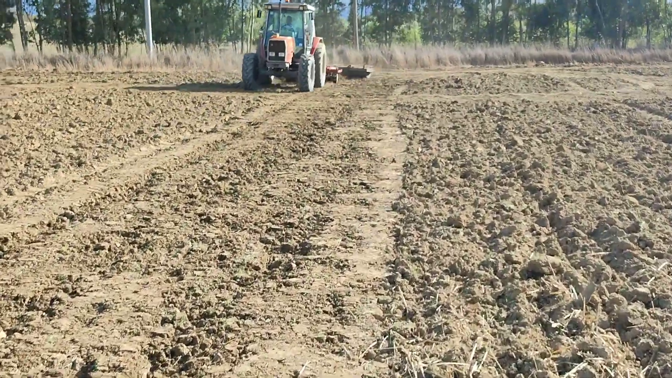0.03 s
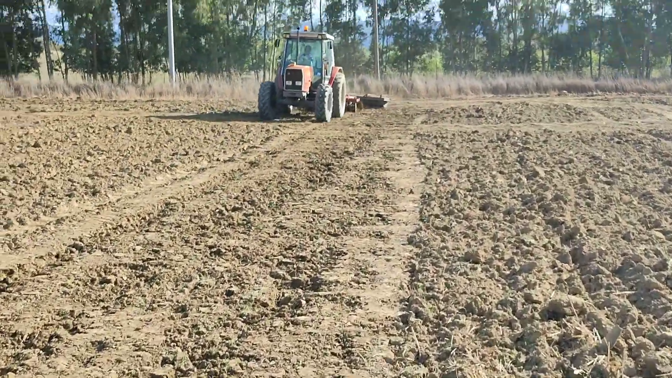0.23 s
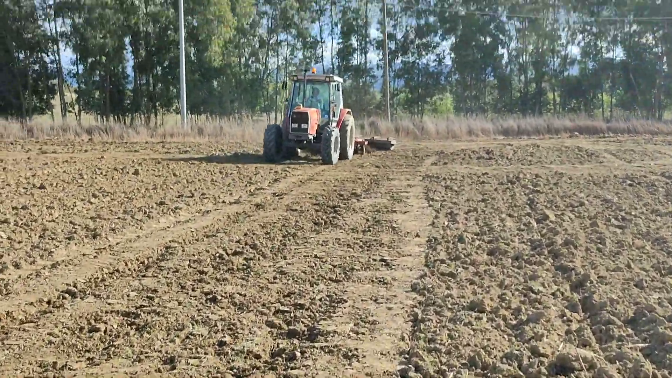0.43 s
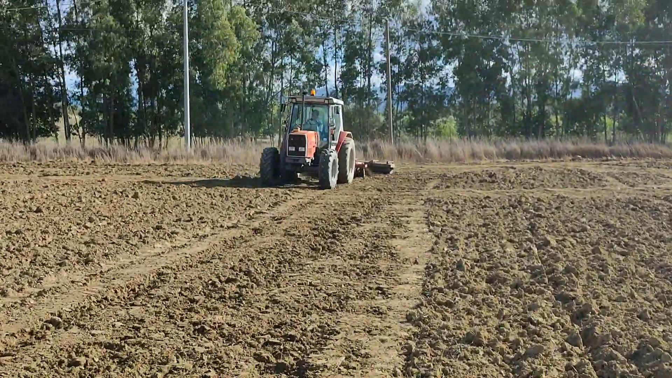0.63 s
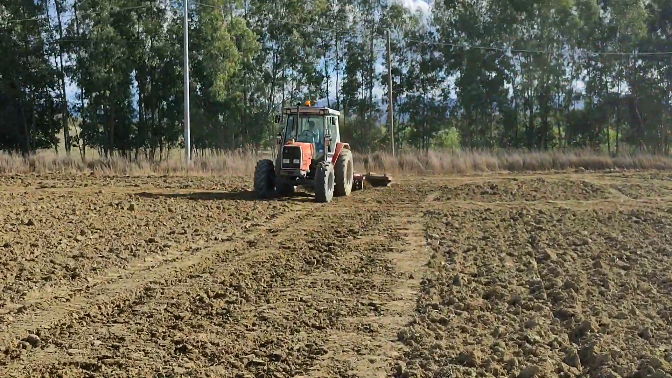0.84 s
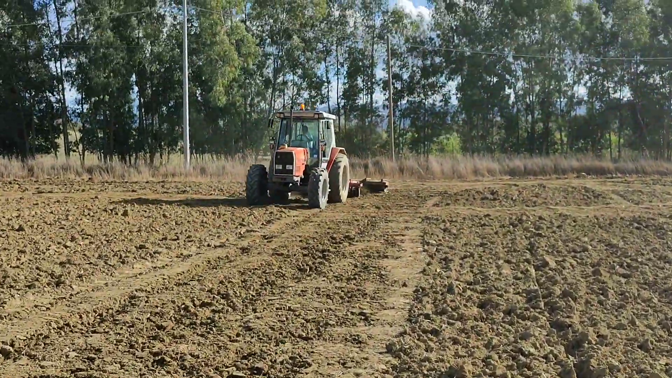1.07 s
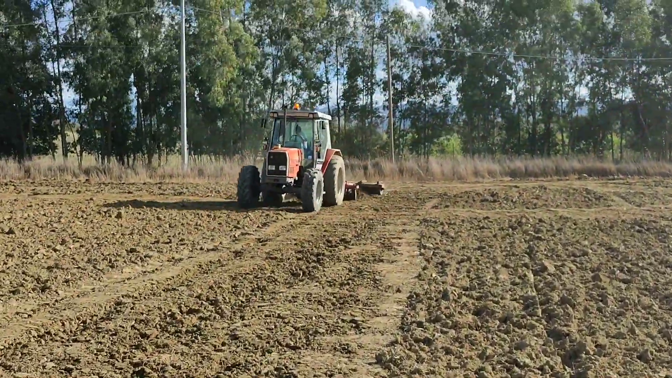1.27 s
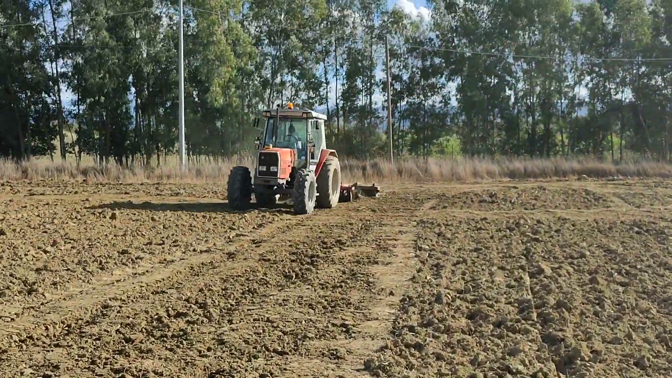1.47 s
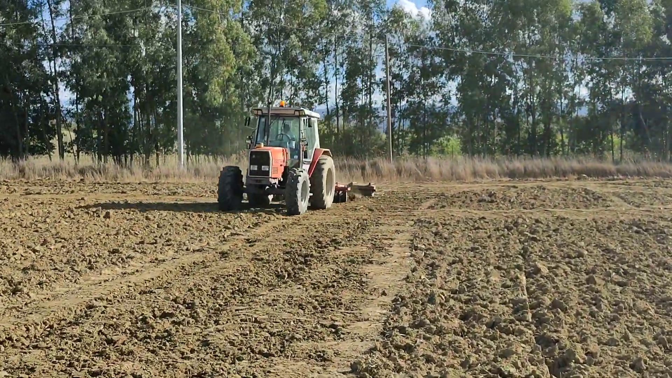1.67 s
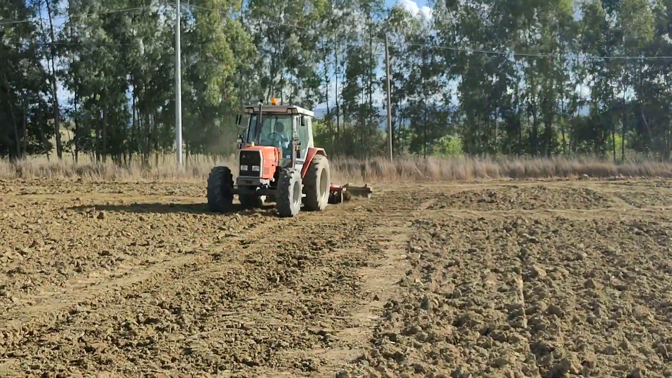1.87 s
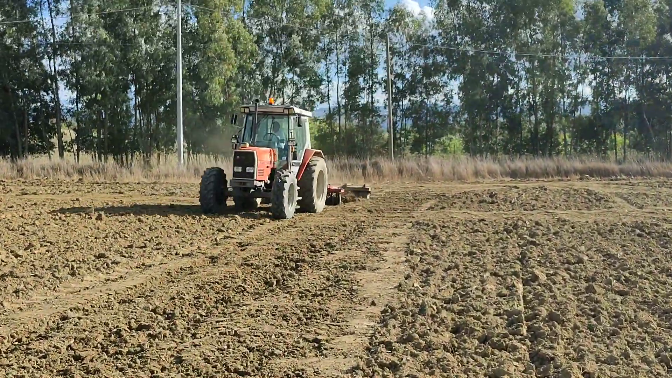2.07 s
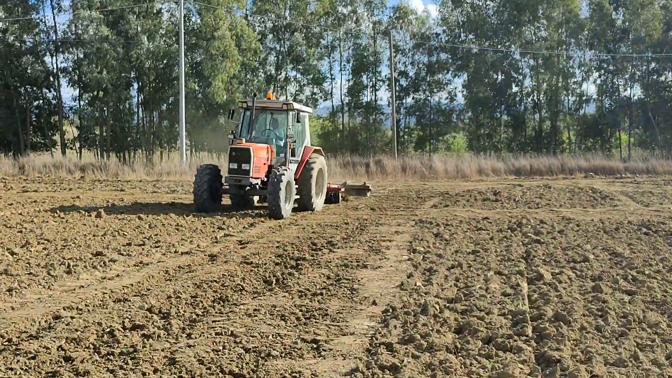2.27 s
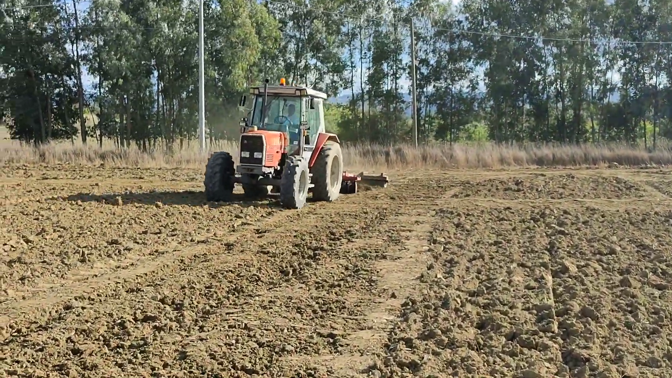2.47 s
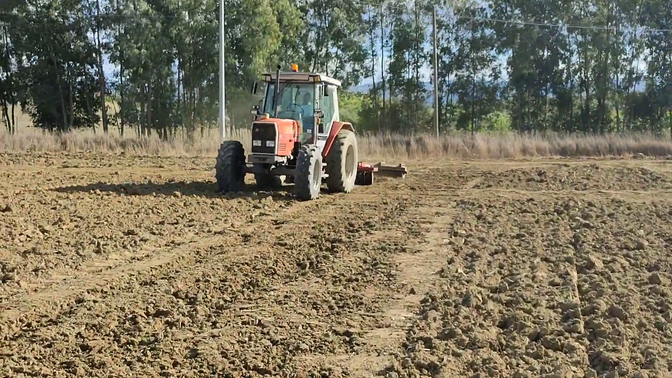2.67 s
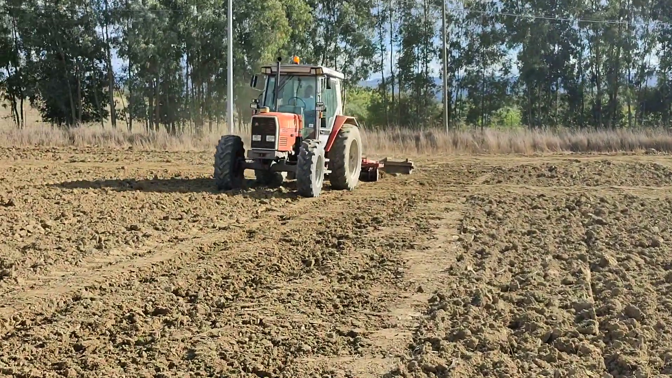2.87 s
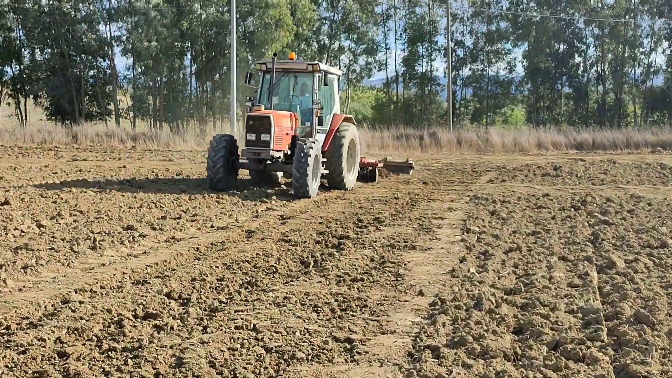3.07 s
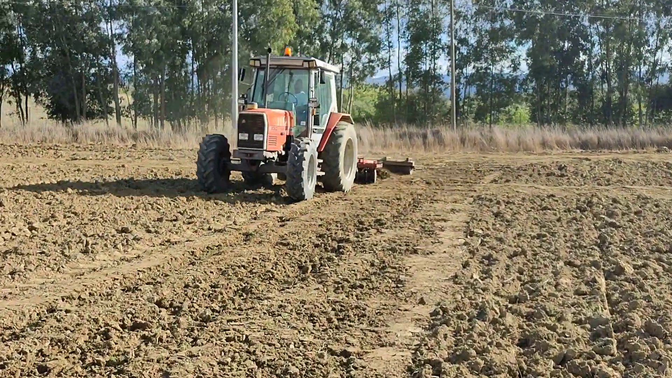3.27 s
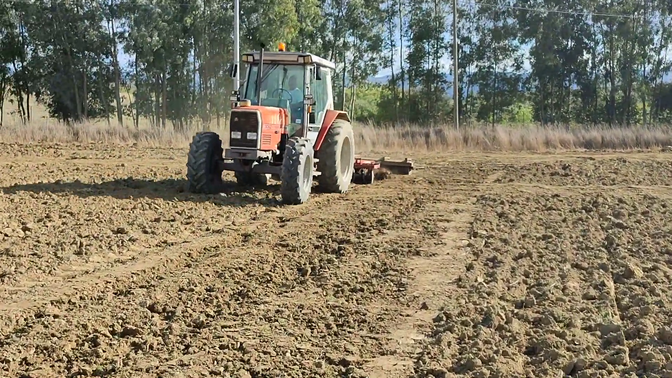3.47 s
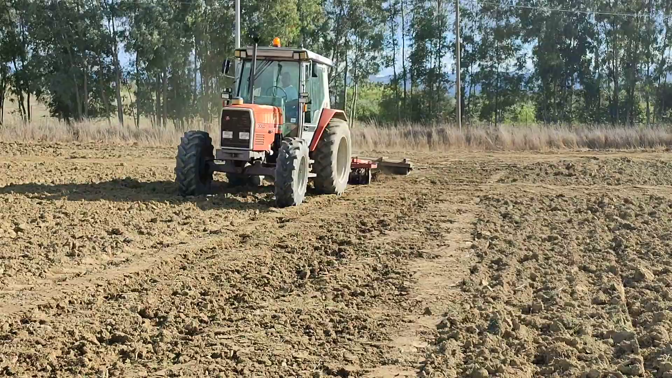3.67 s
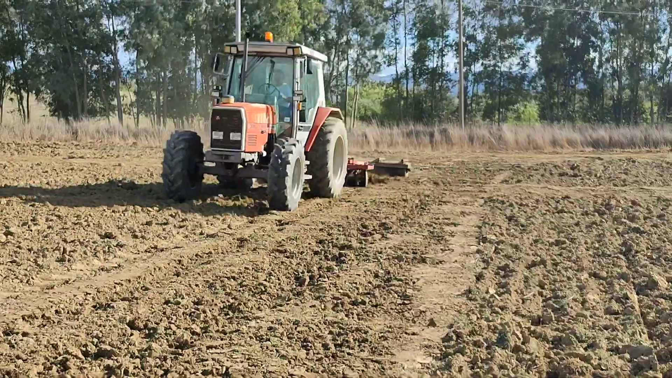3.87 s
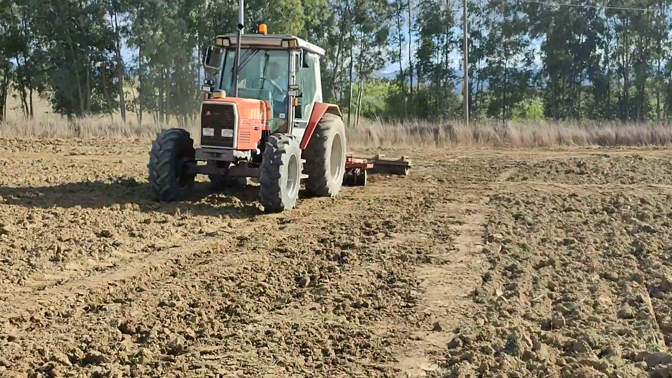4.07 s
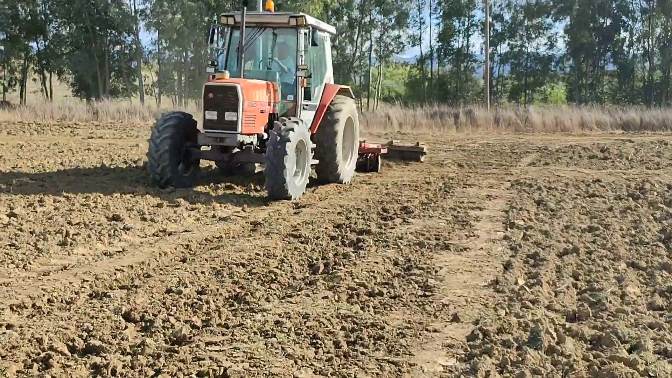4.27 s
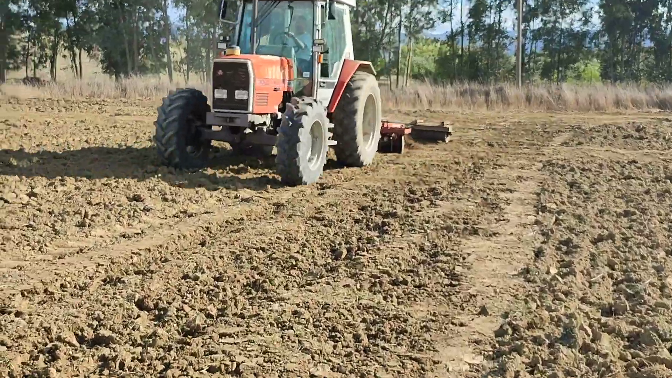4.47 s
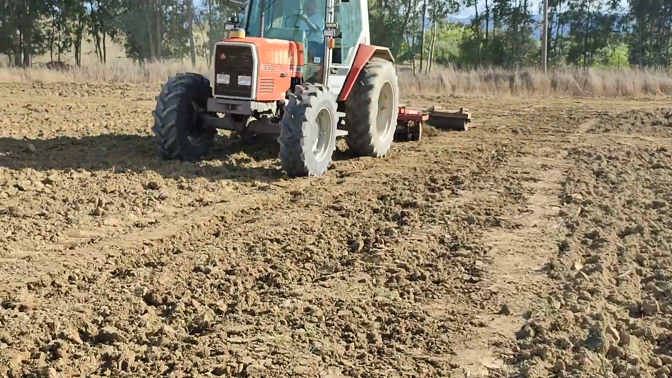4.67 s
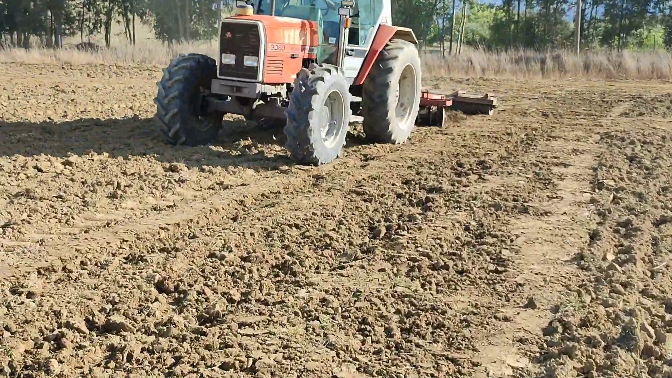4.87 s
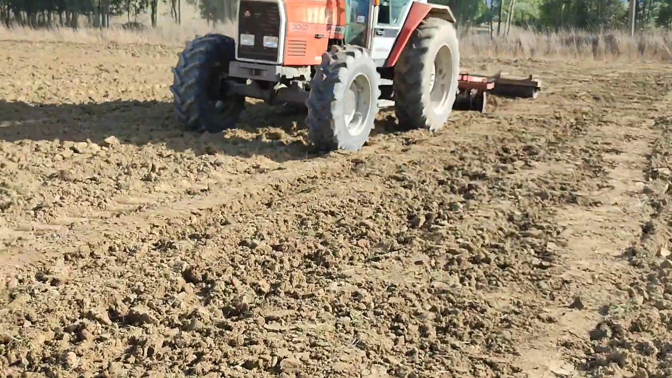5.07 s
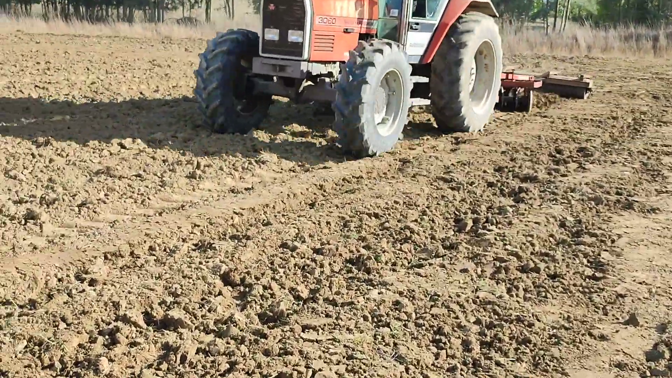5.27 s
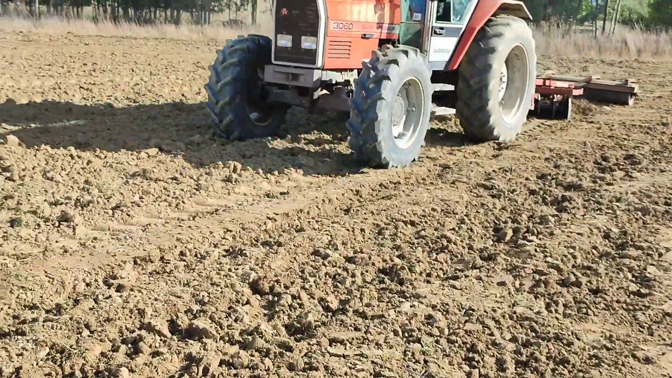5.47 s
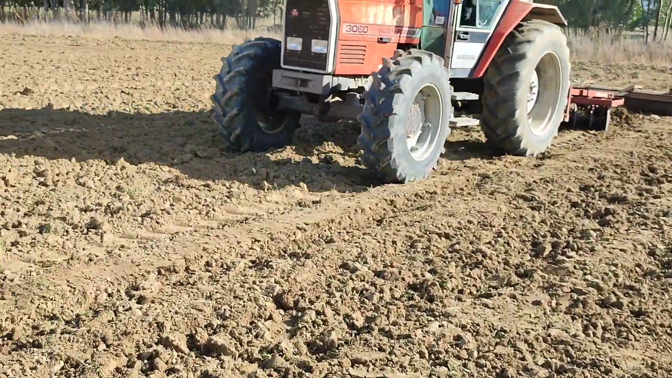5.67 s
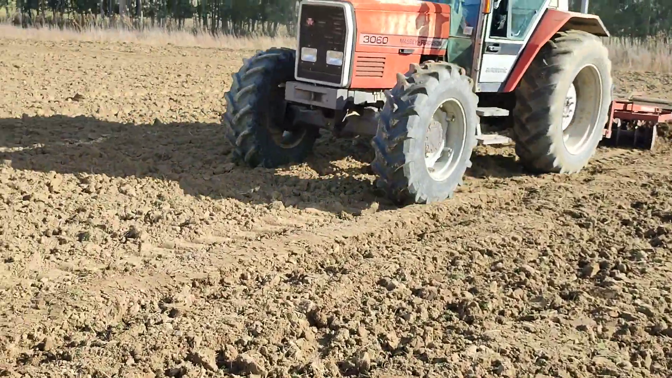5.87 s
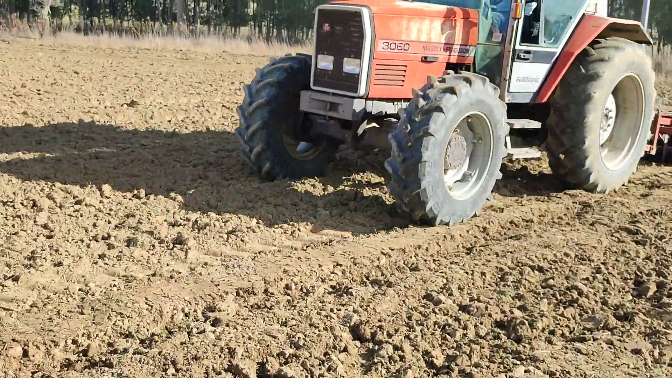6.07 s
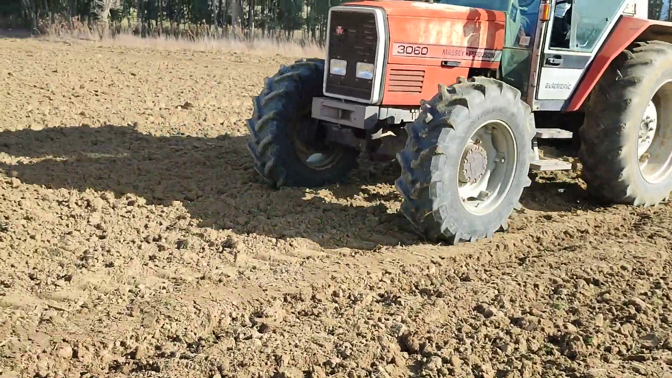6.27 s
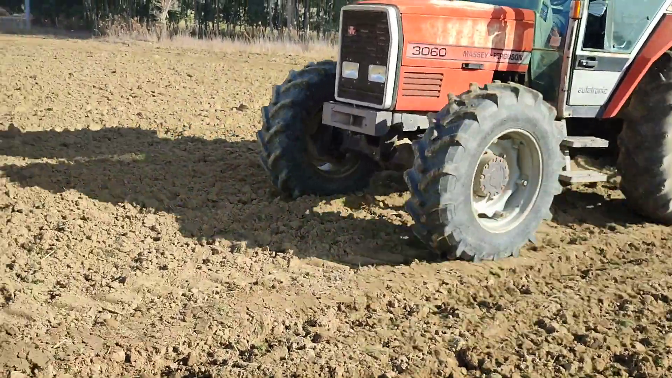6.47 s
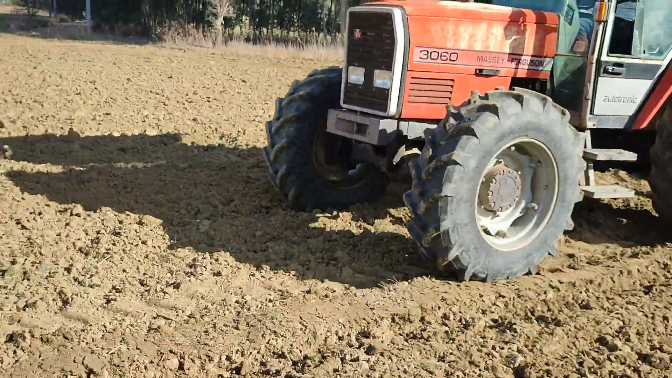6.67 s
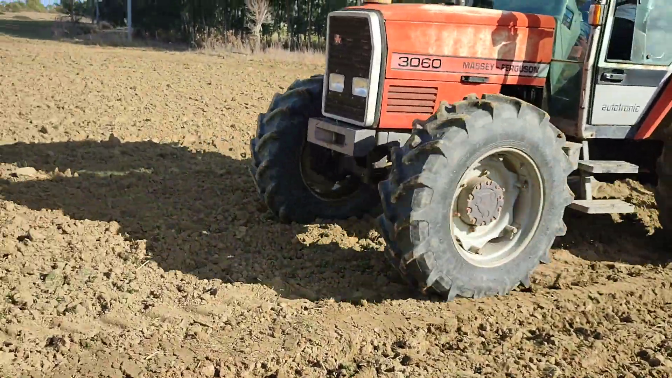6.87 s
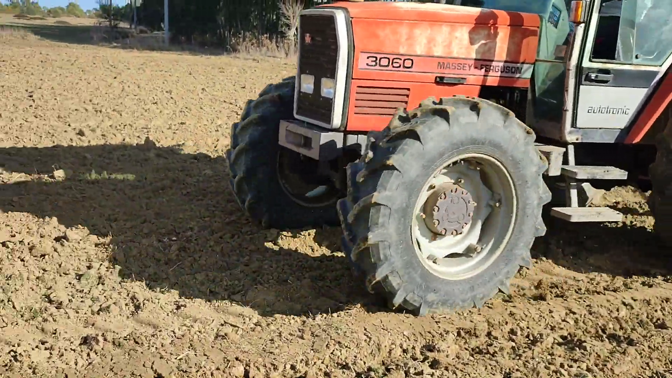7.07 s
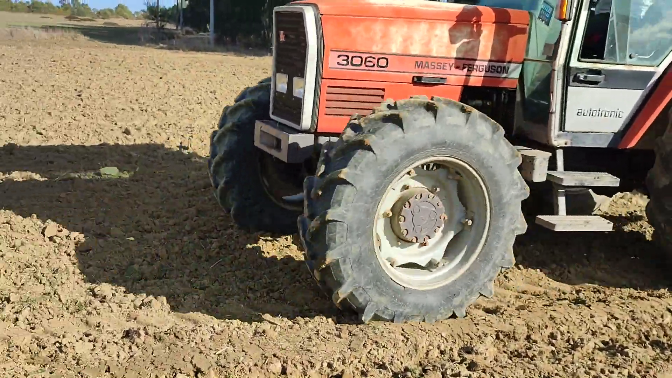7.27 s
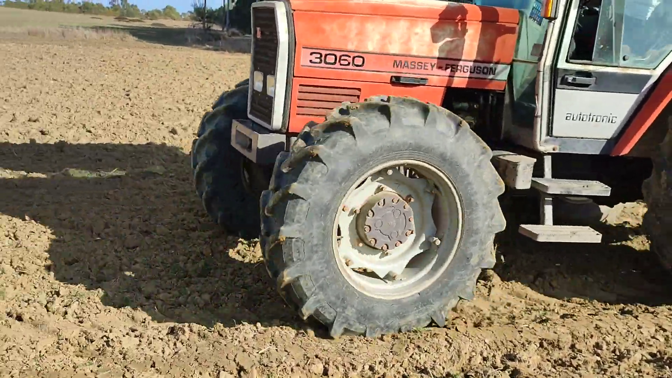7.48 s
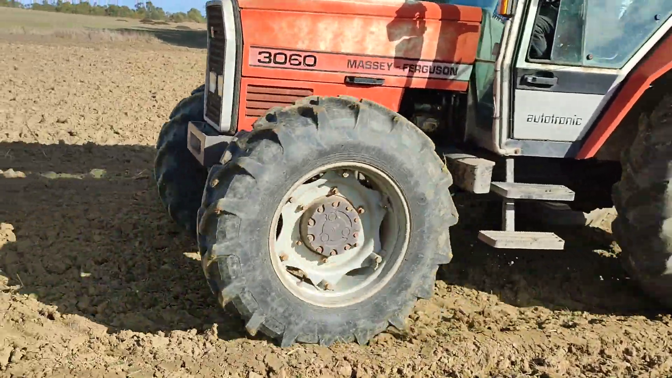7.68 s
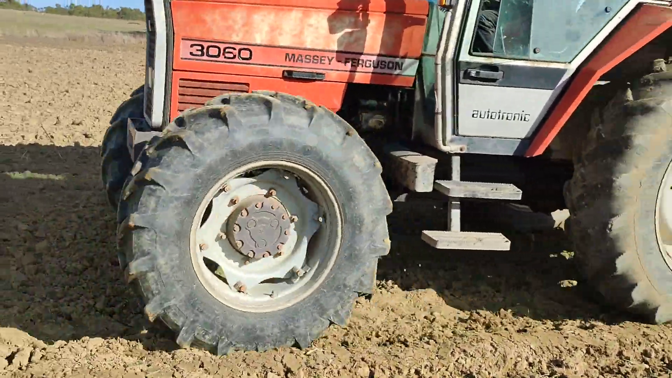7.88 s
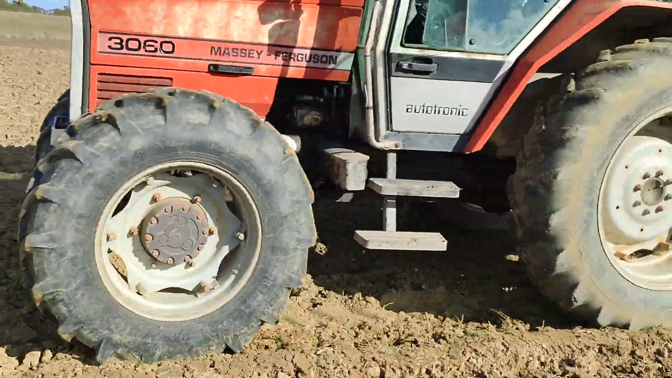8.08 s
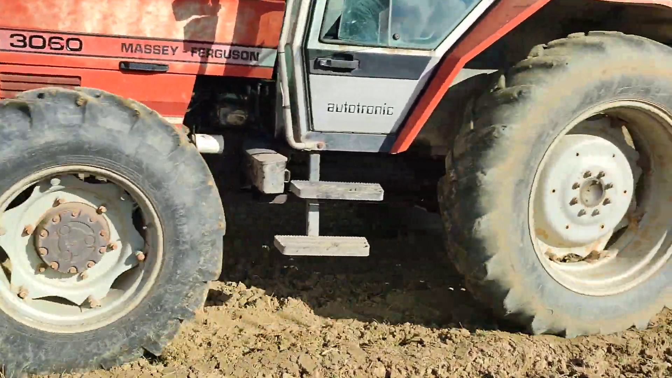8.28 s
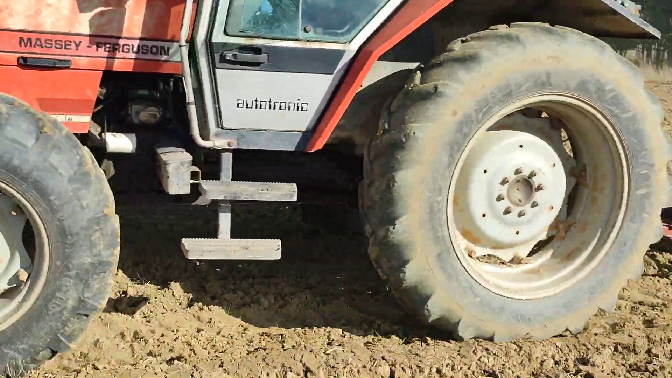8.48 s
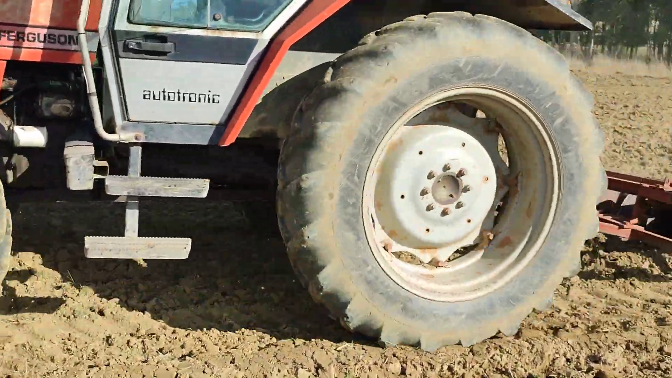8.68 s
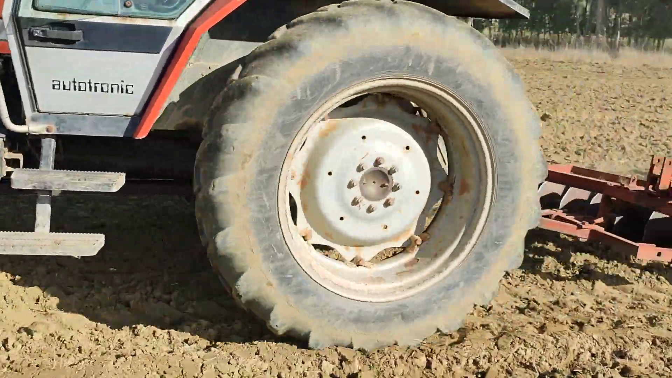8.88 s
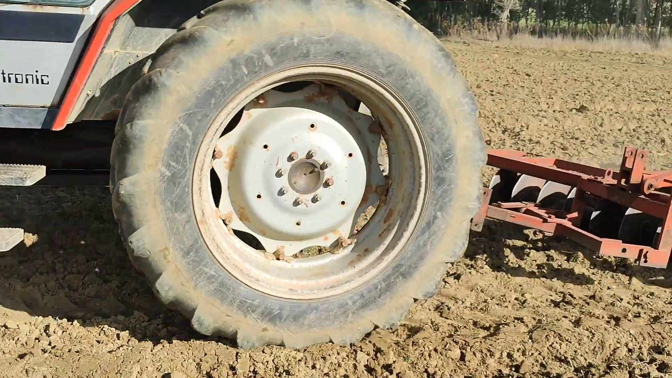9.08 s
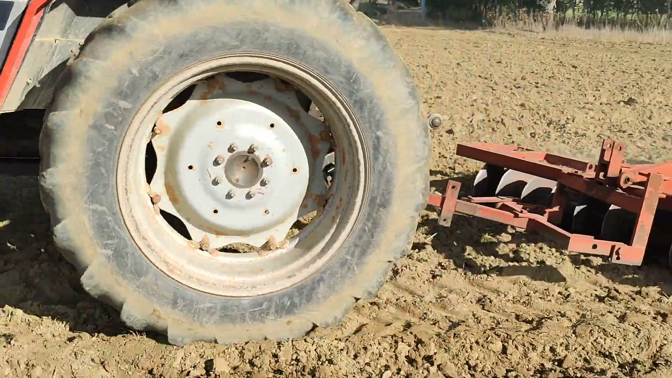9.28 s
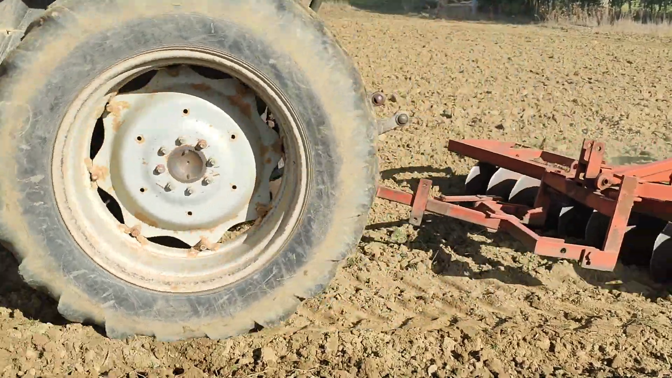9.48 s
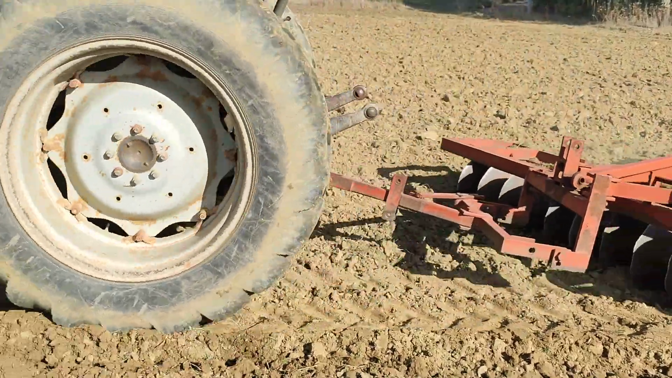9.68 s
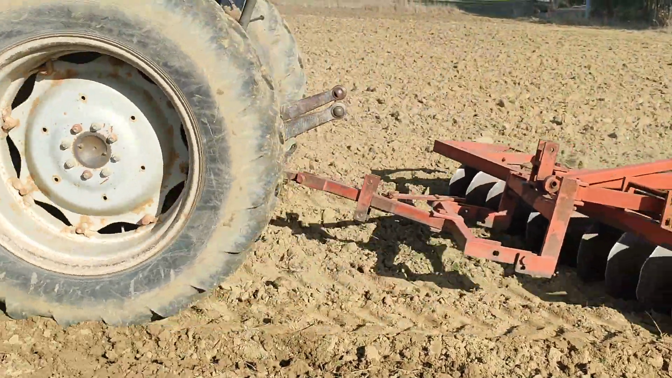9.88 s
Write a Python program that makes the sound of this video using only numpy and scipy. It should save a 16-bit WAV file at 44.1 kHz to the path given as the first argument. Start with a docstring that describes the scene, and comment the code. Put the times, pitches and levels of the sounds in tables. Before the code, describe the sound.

A diesel tractor works across an open field, at first some way off, with a steady low exhaust drone and fast engine knocking. Its towed disc harrow gives thin squeaks, and a dry bearing chirps on and off until about 7.5 seconds. A few tiny stone ticks come between 2 and 3.5 seconds. Wind rumbles on the microphone, mostly on the left, with hard thumps around 1 second, from 4 to 5 seconds and near 6.8 seconds. A dry crackle of soil runs underneath, loudest just before 6 seconds. The engine grows steadily louder, gaining hiss and gear whine, while steel parts ring in brief swells from about 5 seconds. Around 8 seconds the tractor passes close and briefly speeds up. At about 9 seconds it eases off and begins to move away, as the ringing discs draw near until the end at about 10 seconds.

```python
"""A four-cylinder diesel tractor drags a disc harrow (a row of steel discs) over a ploughed field.
At first it is some way off: the exhaust drones, each firing knocks the engine block, discs squeak and
a dry bearing chirps. As it nears, gusts thump the microphones, mostly the left. A dry crackle of soil
runs underneath, loudest just before 6 s. Steel parts ring in brief swells. Around 8 s the engine passes
close and briefly speeds up. Then it eases off and moves away, while the ringing discs draw near."""
import sys
import numpy as np
from scipy import signal
from scipy.fft import rfft, irfft, next_fast_len
from scipy.io import wavfile
from scipy.ndimage import uniform_filter1d, map_coordinates

SR = 44100
rng = np.random.default_rng(int(sys.argv[2]) if len(sys.argv) > 2 else 0)


def master_out(mix):
    """Clip the mix to full scale and print it as 16-bit PCM to the path in sys.argv[1]."""
    frames = np.transpose(np.atleast_2d(mix))
    ceiling = np.clip(frames, -1, 1)
    pcm = np.round(ceiling * 32767).astype(np.int16)
    wavfile.write(sys.argv[1], SR, pcm)


N = 437455
T = np.arange(N) / SR
FFT_SIZE = next_fast_len(N)
HZ = np.maximum(np.arange(FFT_SIZE // 2 + 1) * SR / FFT_SIZE, 1)

# Engine speed, with one push on the throttle: time_s, firings_per_s
ENGINE_SPEED = [(0, 59.1), (1.5, 58.5), (2.5, 58.1), (3.2, 58.5), (4.5, 58.5), (5, 58.0), (6, 58.05),
                (7.4, 58.35), (7.95, 58.3), (8.4, 61.3), (8.7, 64.9), (8.85, 64.8), (8.93, 61.4),
                (9.05, 59.6), (9.22, 59.8), (9.5, 58.3), (9.92, 58.5)]
# Tones of the exhaust pipe and silencer: multiple, level_db, falloff, behind_db, revved_db, slack_db
# Pitch is multiple x firing rate. A falloff of 1 halves the strength at twice the distance.
# The last three columns are added when heard from behind, when revved and when the throttle is let go.
PIPE_TONES = [(1, -13.5, 1.12, 0, 0.3, -2), (2, -32.3, 0.5, -3.5, 10, 0), (5, -36, 1.6, -0.5, -8, -9)]
SILENCER_TONES = [(3, -22.5, 2.3, 5.5, 0.5, -6), (4, -15, 2.45, 3.5, -2, -11.5)]
# Side facing us (0 far front, 1 front corner, 2 flank, 3 rear): time_s, side, right_delay_ms
VIEW = [(0, 0.89, 0.12), (1.5, 0.17, 0.12), (3.3, 0.1, 0.11), (5, 0.59, 0.12), (6, 1.03, 0.09),
        (6.9, 1.3, 0.071), (7.7, 1.64, 0.077), (8.1, 2.22, 0.26), (8.6, 2.03, 0.29), (9.1, 2.92, 0.4),
        (9.92, 3.18, 0.42)]
# Tone colour of the clatter from each side; a ground echo notches the front one: pitch_hz, gain_db
FRONT_COLOUR = [(140, -2), (210, -6), (350, -5.5), (445, -13), (540, 1.5), (690, 3.5), (860, 2),
                (1010, -13), (1140, 2.5), (1270, 3.5), (1440, -0.5), (1720, -15), (1980, -6), (2290, -20),
                (2520, -9.5), (3050, -16), (3350, -19.5), (4200, -21)]
CORNER_COLOUR = [(170, 8), (400, -4), (480, -13.5), (640, 6), (850, 3.5), (1100, -6.5), (1450, 2.5),
                 (1900, -12.5), (2150, -3.5), (2400, -12.5), (2900, -14.5), (3500, -16.5), (4200, -24.5)]
FLANK_COLOUR = [(140, 0.5), (340, -4), (470, -17.5), (620, -5), (800, -4), (1100, -8), (1280, -7.5),
                (1550, -9.5), (1850, -11), (2200, -8), (2800, -21), (3400, -27.5), (4200, -33)]
REAR_COLOUR = [(140, -3.5), (260, -4), (370, -3.5), (540, -13), (760, -5), (1000, -6.5), (1200, -4.5),
               (1430, -13), (1750, -11.5), (2100, -15), (2500, -17.5), (3000, -24), (3600, -23),
               (4200, -31.5)]
# Tone colour of the fan and fuel injector hiss: pitch_hz, gain_db
HISS_COLOUR = [(3600, -1), (4150, -4), (4700, -3.5), (5600, 3), (6300, 2), (6900, 3), (7500, -1.5),
               (8100, 2.5), (8700, 1.5), (10000, 1), (13500, -11)]
# Steady fan rush next to a full injector tick, for sides 0 to 3: gain
FAN_RUSH_BY_SIDE = [.5, .36, .7, .95]
# Hiss escaping toward sides 0 to 3: gain_db
HISS_BY_SIDE = [1.5, 3, 0, -1]
# How alike the engine noise is in both ears: pitch_hz, likeness (0 to 1)
EAR_LIKENESS = [(100, .95), (700, .92), (1300, .92), (2300, .74), (5000, .4), (12000, .2)]
# The treble briefly dips or flares: middle_s, length_s, gain_db
TREBLE_DIPS = [(4.818, 0.21, -13), (5.845, 0.16, -8), (5.94, 0.15, 5.5)]
# Fan and gear whines: middle_s, length_s, multiple (of the firing rate), level_db
GEAR_WHINES = [(7.7, 3.4, 5, -39), (7.6, 1.4, 3.75, -35), (8.7, .95, 8.25, -30.5), (7.22, 1, 12.27, -28),
               (7.98, .45, 12.27, -30), (6.55, .5, 13.17, -31), (7.8, 1.6, 14.75, -36),
               (7.2, 1, 25.05, -38)]
# Ringing notes of a thin steel part: pitch_hz, width_hz, gain_db
THIN_STEEL_NOTES = [(3615, 35, 0), (5020, 60, -10), (5280, 90, -12)]
# How loudly that part rings: time_s, level_db
THIN_STEEL_LEVEL = [(0, -58), (.9, -56), (1.3, -60), (2.6, -60), (3.2, -57), (4.2, -54), (5, -54),
                    (5.8, -58), (7.5, -53.5), (8.3, -62)]
# Notes the discs ring as they rub through the soil: pitch_hz, width_hz, level_db, left_minus_right_db
DISC_NOTES = [(2040, 240, -44.5, 6), (2577, 150, -50.5, 20), (3070, 170, -55, -11), (4070, 270, -51.5, 5)]
# Steel parts of the tractor and harrow ring briefly: middle_s, length_s, pitch_hz, width_hz, level_db
STEEL_SWELLS = [(4.9, .9, 2130, 110, -42), (6.55, .9, 3130, 300, -44), (6.9, 1.1, 1670, 130, -36),
                (7.72, .95, 2140, 130, -34.5), (8.25, .6, 2600, 160, -37.5), (8.66, .55, 2450, 400, -33),
                (9.2, .45, 2770, 90, -42), (9.8, 1.3, 1724, 170, -31.5)]
# Disc squeaks: middle_s, length_s, start_hz, end_hz, roughness (0 to 1), level_db
DISC_SQUEAKS = [(0.52, .34, 2680, 3180, 1, -48.5), (1.08, .6, 2560, 2500, .7, -51),
                (1.6, .4, 2950, 3100, .6, -48.5), (2.7, 1.6, 2530, 2590, .3, -56),
                (3.17, .32, 2900, 2580, .8, -47), (3.42, .3, 2560, 2600, .7, -48),
                (6.12, .16, 2750, 2880, 1, -44), (6.31, .18, 2860, 3000, 1, -40),
                (6.76, .22, 2980, 2780, 1, -42.5)]
# Chirps of a dry bearing: middle_s, level_db, pitch_hz
BEARING_CHIRPS = [(0.984, -42, 4200), (1.053, -40, 4100), (1.259, -42, 4080), (1.324, -42, 4120),
                  (1.67, -41, 4150), (1.78, -43, 4150), (1.941, -40, 4180), (1.994, -42, 4200),
                  (2.026, -42, 4200), (2.093, -43, 4150), (2.58, -41, 4050), (2.69, -41, 4250),
                  (3.53, -40, 4200), (3.58, -42, 4050), (4.01, -38, 4080), (4.509, -40, 4250),
                  (4.556, -38, 4200), (5.869, -38.5, 4060), (5.92, -39, 4150), (5.99, -36.5, 4170),
                  (6.059, -37.5, 4170), (7.021, -37, 4340), (7.298, -34, 4300), (7.454, -33, 4270)]
# Stones hitting the discs: start_s, level_db
STONE_HITS = [(2.24, -33), (2.605, -32), (3.095, -25), (3.545, -41)]
# The breeze between gusts: time_s, left_db, right_db
BREEZE_LEVEL = [(0, -29.5, -58), (1.0, -24, -31.5), (1.75, -28, -35), (2.05, -38, -60), (2.4, -34.5, -56),
                (2.65, -21, -30), (3.3, -22, -30), (3.85, -17.5, -28), (4.35, -15, -23),
                (5.5, -14.5, -22.5), (6.3, -15, -16), (7.2, -18.5, -22), (8.7, -20.5, -25),
                (9.5, -22, -20.5), (9.92, -26, -23.5)]
# Gusts on top of the breeze: start_s, length_s, left_db, right_db
WIND_GUSTS = [(0.339, 0.042, -20, -57), (0.45, 0.053, -21.5, -57), (0.649, 0.022, -14.5, -35),
              (0.707, 0.035, -13, -41), (0.778, 0.02, -11, -33), (0.832, 0.015, -12, -30),
              (0.889, 0.042, -13.5, -26), (0.963, 0.032, -14, -23), (1.025, 0.022, -15.5, -32),
              (1.11, 0.032, -20.5, -36), (1.493, 0.034, -25, -40), (1.677, 0.041, -23.5, -28),
              (2.658, 0.093, -21, -35), (2.824, 0.035, -21.5, -38), (3.046, 0.027, -17.5, -35),
              (3.436, 0.1, -14.5, -29), (3.664, 0.081, -17.5, -34), (3.935, 0.097, -13.5, -30),
              (4.233, 0.24, -14, -33), (4.49, 0.29, -16, -28), (4.879, 0.12, -13.5, -34),
              (5.187, 0.07, -33, -21), (5.73, 0.075, -23, -17.5), (5.95, 0.18, -18, -16.5),
              (6.215, 0.15, -13.5, -30), (6.804, 0.13, -19.5, -23), (8.093, 0.079, -21, -17),
              (9.207, 0.056, -14.5, -27), (9.507, 0.042, -16.5, -31)]
# Tone colour of air swirling at a microphone: pitch_hz, gain_db
WIND_COLOUR = [(15, -2.5), (35, 3.5), (65, 1), (120, 0.5), (190, -1), (330, -4.5), (500, -8.5), (750, -14),
               (1100, -21), (1800, -33.5), (4000, -71)]
# Hard thumps of wind on the left microphone: time_s, level_db
WIND_THUMPS = [(0.901, -9), (0.974, -10), (3.986, -2), (4.117, 0), (4.5, 4), (4.579, -2.5), (4.777, 5.5),
               (4.904, -3), (6.776, 8)]
# Extra lag as sound from ahead bends round to the right microphone: pitch_hz, lag_radians
BEND_LAG = [(1200, 0), (1700, .6), (1850, -.4), (2150, .4), (2290, 1.4), (2430, -1.3), (3000, -1.2),
            (3300, -.4), (3600, -.6), (3950, .7), (4150, -.9), (4500, 0)]
# Tone colour of each microphone: pitch_hz, gain_db
LEFT_MIC_COLOUR = [(200, -0.5), (700, -0.5), (1200, -2), (2200, 2), (4200, 9), (6000, 1.5), (7500, 4.5),
                   (8900, -1.5), (9500, -19.5), (13000, -14)]
RIGHT_MIC_COLOUR = [(200, -1), (700, 0), (1200, 1.5), (2200, 1), (4200, 7.5), (6000, -5.5), (7000, -8.5),
                    (8200, -31), (9500, -18.5), (13000, -15.5)]

# Strength of each cylinder's knock and of its injector's tick
KNOCK_DB, TICK_DB = [-5.5, -8.0, -7.5, -10.0], [0, -1, -4, -2]
DRIVE_M_PER_S = 1.923


def exhaust(firings):
    """Each firing puffs out gas; the puffs blend into deep tones that waver with load and moving air."""
    rev, slack, out = revved(), slackened(), 0
    outlets = [(PIPE_TONES, 7.75, 4.53, .7), (SILENCER_TONES, 8.15, 2.9, 1.0)]
    for tones, pass_s, nearest_m, waver_db in outlets:
        far_db = distance_db(pass_s, nearest_m)
        behind = np.sin(np.arctan2(DRIVE_M_PER_S * (T - pass_s), nearest_m))  # -1 coming, +1 going
        for multiple, db, falloff, behind_db, revved_db, slack_db in tones:
            level_db = db + falloff * far_db + behind_db * behind
            level_db += revved_db * rev + slack_db * slack + waver_db * drift(20)
            out = out + from_db(level_db) * tone(multiple * firings)
    return out * from_db([[.3], [-.3]])  # a touch louder on the left


def clatter(firings):
    """Each firing knocks the engine block; the tone colour changes with the side that faces us."""
    facing = over_time(VIEW)[0]
    knocks = impacts(firings, repeat=.54, steady=.7, decay=.35, uneven_db=1.3, cylinder_db=KNOCK_DB)
    band_limit = 1 / np.sqrt((1 + (HZ / 4400) ** 24) * (1 + (70 / HZ) ** 4))
    knock_band = (HZ > 1300) & (HZ < 4500)
    out = 0
    for side, colour in enumerate([FRONT_COLOUR, CORNER_COLOUR, FLANK_COLOUR, REAR_COLOUR]):
        gain = from_db(over_hz(colour)) * band_limit
        gain /= np.sqrt(np.mean(gain ** 2 * knock_band))  # all sides equally strong in this band
        share = np.maximum(1 - np.abs(facing - side), 0)
        out = out + share * filtered(knocks, gain)
    level_db = -27.5 + distance_db(pass_s=8.4, nearest_m=3.32, falloff=1.11) + 3 * revved()
    return out * from_db(level_db + .2 * dips_db() + .84 * drift(13))


def hiss(firings):
    """Fuel injectors tick between knocks: crisp from the front corner, lost in fan rush from behind."""
    facing = over_time(VIEW)[0]
    rush = np.interp(facing, range(4), FAN_RUSH_BY_SIDE)
    ticks = impacts(firings + .2, repeat=.12, steady=rush, decay=.3, uneven_db=1.4, cylinder_db=TICK_DB)
    bright = unit_power(filtered(ticks, from_db(over_hz(HISS_COLOUR))))
    level_db = -35.5 + distance_db(pass_s=7.8, nearest_m=5.8, falloff=1.94) + 5.5 * revved()
    side_db = np.interp(facing, range(4), HISS_BY_SIDE)
    return bright * from_db(level_db + side_db + dips_db() + 1.35 * drift(10.3))


def impacts(firings, repeat, steady, decay, uneven_db, cylinder_db):
    """A stereo burst of noise per firing; the share `repeat` comes back every four firings."""
    points, layers = 3000, []
    bins = points // 2 + 1
    firing_number = firings.astype(int)
    for _ in range(2):
        strengths = from_db(3 * np.clip(rng.standard_normal(bins), -2, 1.5))  # no pitch stands out
        cycle = irfft(strengths * np.exp(2j * np.pi * rng.random(bins)))
        pattern = np.interp(firings / 4 % 1 * points, np.arange(points), cycle)
        noise = np.sqrt(repeat) * unit_power(pattern) + np.sqrt(1 - repeat) * rng.standard_normal(N)
        chance_db = uneven_db * rng.standard_normal(firing_number.max() + 1)[firing_number]
        strength = from_db(np.take(cylinder_db, firing_number, mode="wrap") + chance_db)
        burst = strength * np.exp(-(firings % 1) / decay)
        layers.append(unit_power(noise * (steady + burst)))
    return to_stereo(*layers)


def whines(firings):
    """The fan and gears sing tones that follow the engine speed."""
    waver_cycles = drift(13) / (4 * np.pi)
    return sum(from_db(db + 1.2 * drift(12)) * swell(s, length) * tone(multiple * firings + waver_cycles)
               for s, length, multiple, db in GEAR_WHINES)


def sizzle():
    """The engine's highest hiss, which only carries a short way."""
    noise = band_pass(rng.standard_normal((2, N)), 10500, 14000)
    return noise * from_db(-36 + distance_db(pass_s=8.66, nearest_m=1.9, falloff=1.3))


def thin_steel():
    """The engine shakes a thin steel part into a high, fluttering ring."""
    shaking = rng.standard_normal(N)
    ringing = sum(from_db(db) * ring(shaking, hz, width) for hz, width, db in THIN_STEEL_NOTES)
    return from_db(over_time(THIN_STEEL_LEVEL)[0]) * ringing


def revved(start_s=8.05, rise_s=.4, hold_s=.33, fall_s=.13):
    """How far the throttle is pushed beyond cruising, 0 to 1."""
    return np.interp(T, np.cumsum([start_s, rise_s, hold_s, fall_s]), [0, 1, 1, 0])


def slackened(peak_s=8.95, rise_s=.13, recover_s=.28):
    """How slack the exhaust goes as the throttle is let go, 0 to 1."""
    return np.clip((T - peak_s) / rise_s + 1, 0, 1) * np.exp(-np.maximum(T - peak_s, 0) / recover_s)


def dips_db():
    """Brief dips and flares of the treble."""
    return sum(db * swell(s, length) for s, length, db in TREBLE_DIPS)


def ringing_steel(firings, chatter_db=3.5, throb_db=1):
    """The discs ring steadily, and tractor and harrow parts in brief swells; all throb with the engine."""
    strength = from_db(chatter_db * drift(25) + throb_db * np.cos(2 * np.pi * firings))
    shared, apart = rng.standard_normal((2, N)) * strength
    shaking = np.array([shared + .5 * apart, shared - .5 * apart])
    far_db, out = distance_db(pass_s=10.5, nearest_m=3.9), 0
    for hz, width, db, pan_db in DISC_NOTES:
        pan = from_db([[pan_db / 2], [-pan_db / 2]])
        out = out + ring(shaking, hz, width) * from_db(db + far_db + 1.5 * drift(6)) * pan
    for s, length, hz, width, db in STEEL_SWELLS:
        out = out + ring(shaking, hz, width) * from_db(db) * swell(s, length)
    return out


def squeaks(firings, jitter_hz=85, flutter_db=1.8):
    """A disc sticks and slips on its axle: a rough tone that slides and flutters."""
    out = 0
    for s, length, start_hz, end_hz, roughness, db in DISC_SQUEAKS:
        slide_hz = np.interp(T, [s - length / 2, s + length / 2], [start_hz, end_hz])
        pitch_hz = slide_hz + roughness * jitter_hz * drift(88.5)
        out = out + from_db(db) * swell(s, length) * tone(np.cumsum(pitch_hz) / SR)
    return out * from_db(flutter_db * (drift(25) + np.cos(2 * np.pi * firings)))


def chirps(length_s=.015, gap_s=.018, fade_db=5, scatter_hz=50):
    """Each slip of a dry bearing makes a short ping that rattles twice more, fading."""
    out = 0
    for s, db, hz in BEARING_CHIRPS:
        for rattle in range(3):
            ping = np.sin(2 * np.pi * (hz + scatter_hz * rng.standard_normal()) * T)
            out = out + from_db(db - rattle * fade_db) * swell(s + rattle * gap_s, length_s) * ping
    return out


def soil(grains_per_s=580, decay_s=.0089):
    """A dry, grainy crackle of soil runs underneath, loudest just before 6 s."""
    sizes = from_db(3 * np.minimum(rng.exponential(1, (2, N)), 4))
    cracks = sizes * (rng.random((2, N)) < grains_per_s / SR)
    fading = signal.lfilter([1], [1, -np.exp(-1 / (decay_s * SR))], cracks + 1e-18)
    crumble = band_pass(fading * rng.standard_normal((2, N)), 2500, 12000, order=1)
    rise_and_fall_db = distance_db(5.73, 1.84, falloff=.77)
    return crumble * from_db(-40 + rise_and_fall_db)


def stones(decay_s=.0036):
    """Stones strike the discs with tiny bright ticks."""
    strikes = sum(from_db(db) * (T >= s) * np.exp(-np.minimum(np.abs(T - s) / decay_s, 20))
                  for s, db in STONE_HITS)
    treble_only = signal.butter(2, 7000, "high", fs=SR, output="sos")
    return signal.sosfilt(treble_only, strikes * rng.standard_normal((2, N)))


def wind(level_db, lumpy_db=4.5, rumble_db=-30, roar_span_db=18.5):
    """Swirls of air hit a microphone in quick lumps; harder gusts turn a dull rumble into a roar."""
    lumps = from_db(lumpy_db * np.clip(drift(22), -2, 1.7))
    swirls = filtered(rng.standard_normal(N) * lumps, from_db(over_hz(WIND_COLOUR)))
    # even out slow changes, so the lumps only flutter around level_db
    swirls /= np.sqrt(uniform_filter1d(swirls ** 2, size=SR // 14) + 1e-12)
    dull = filtered(swirls, 1 / (1 + (HZ / 260) ** 2))
    force = np.clip((level_db - rumble_db) / roar_span_db, 0, 1)
    return from_db(level_db) * (dull + force * (swirls - dull))


def wind_level_db(mic, rise_s=.018, fall_s=.03):
    """A wavering breeze plus short gusts at one microphone (0 left, 1 right)."""
    power = from_db(over_time(BREEZE_LEVEL)[mic] + 1.2 * drift(8)) ** 2
    for s, length, *mic_db in WIND_GUSTS:
        gust = np.interp(T, [s - rise_s, s, s + length, s + length + fall_s], [0, 1, 1, 0])
        power += (from_db(mic_db[mic]) * gust) ** 2
    return 10 * np.log10(power)


def thumps(width_s=.00033):
    """One hard swirl of air pushes and pulls the microphone's membrane once."""
    out = np.zeros(N)
    for s, db in WIND_THUMPS:
        offset = (T - s) / width_s - 2
        near = np.abs(offset) < 10
        push_pull = offset[near] * np.exp(-offset[near] ** 2 / 2)
        out[near] += from_db(db) * push_pull * rng.choice([-1, 1])
    return out


def distance_db(pass_s, nearest_m, falloff=1):
    """How much quieter a source driving straight past is than at its nearest point."""
    return -20 * falloff * np.log10(np.hypot(nearest_m, DRIVE_M_PER_S * (T - pass_s)) / nearest_m)


def to_stereo(shared, apart):
    """Mix two noises into left and right, less alike toward the treble."""
    alike = over_hz(EAR_LIKENESS)
    apart = filtered(apart, np.sqrt((1 - alike) / (1 + alike)))
    return np.array([shared + apart, shared - apart])


def reach_right_mic(x):
    """Sound reaches the right microphone a little late; from ahead it also bends round the casing."""
    facing, delay_ms = over_time(VIEW)
    ahead = np.interp(facing, [1.9, 2], [1, 0])
    bent = ahead * filtered(x, np.exp(-1j * over_hz(BEND_LAG))) + (1 - ahead) * x
    return map_coordinates(bent, [np.arange(N) - delay_ms * SR / 1000], order=3, mode="nearest")


def from_db(db):
    """Turn decibels into a gain to multiply by."""
    return 10 ** (np.asarray(db) / 20)


def unit_power(x):
    """Scale to an average power of 1."""
    return x / np.sqrt(np.mean(x ** 2) + 1e-20)


def tone(cycles):
    """A sine wave of power 1, from a running count of its cycles."""
    return np.sqrt(2) * np.sin(2 * np.pi * cycles)


def swell(middle_s, length_s):
    """A smooth rise and fall."""
    return np.cos(np.pi * np.clip((T - middle_s) / length_s, -.5, .5)) ** 2


def drift(rate_hz):
    """A smooth random wobble, about 1 in size; a higher rate wobbles faster."""
    step, warm_up = 40, 2000
    pole = np.exp(-2 * np.pi * rate_hz * step / SR)
    noise = rng.standard_normal(N // step + warm_up + 2)
    slow = signal.lfilter([1], [1, -2 * pole, pole * pole], noise)[warm_up:]
    return np.interp(np.arange(N) / step, np.arange(len(slow)), unit_power(slow))


def over_time(rows):
    """Join a table's rows into one curve over time per value column."""
    time_s, *columns = np.transpose(rows)
    return [np.interp(T, time_s, column) for column in columns]


def over_hz(rows):
    """Join a table's rows into a curve over pitch."""
    hz, value = np.transpose(rows)
    return np.interp(np.log(HZ), np.log(hz), value)


def filtered(x, gain):
    """Give each frequency its own gain."""
    return irfft(rfft(x, FFT_SIZE) * gain, FFT_SIZE)[..., :N]


def band_pass(x, low_hz, high_hz, order=2):
    """Keep one band of frequencies, scaled to power 1."""
    band = signal.butter(order, [low_hz, high_hz], "band", fs=SR, output="sos")
    return unit_power(signal.sosfilt(band, x))


def ring(x, pitch_hz, width_hz):
    """The narrow band that a ringing part picks out of x."""
    return band_pass(x, pitch_hz - width_hz / 2, pitch_hz + width_hz / 2)


def scene():
    """The tractor and harrow, heard slightly earlier on the left, with wind at each microphone."""
    firings_per_s = over_time(ENGINE_SPEED)[0] * (1 + .002 * drift(8))
    firings = np.cumsum(firings_per_s) / SR  # a running count that keeps the parts in step
    engine = exhaust(firings) + whines(firings) + thin_steel()
    engine = engine + clatter(firings) + hiss(firings) + sizzle()
    left, right = engine + soil() + ringing_steel(firings) + stones() + squeaks(firings) + chirps()
    left_db, right_db = wind_level_db(0), wind_level_db(1)
    return np.array([left + wind(left_db) + thumps(), reach_right_mic(right) + wind(right_db)])


def record(dry):
    """Each microphone colours the treble; loud peaks are rounded and the very top is cut."""
    ceiling, stop_hz = .95, 14628
    coloured = filtered(dry, from_db([over_hz(LEFT_MIC_COLOUR), over_hz(RIGHT_MIC_COLOUR)]))
    rounded = coloured / (1 + (coloured / ceiling) ** 8) ** (1 / 8)
    return signal.sosfilt(signal.cheby2(16, 70, stop_hz, fs=SR, output="sos"), rounded)


dry = scene()
out = record(dry)
master_out(out)
```